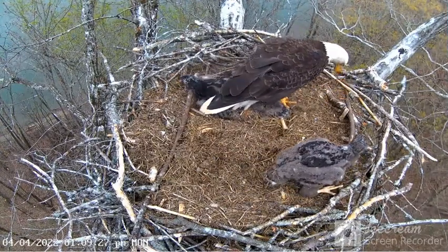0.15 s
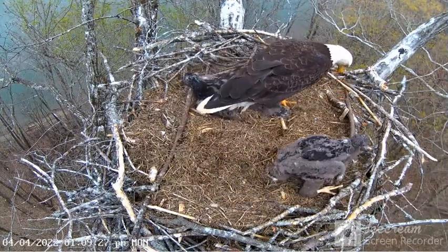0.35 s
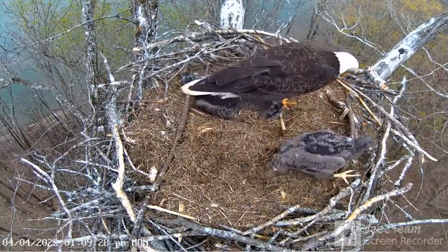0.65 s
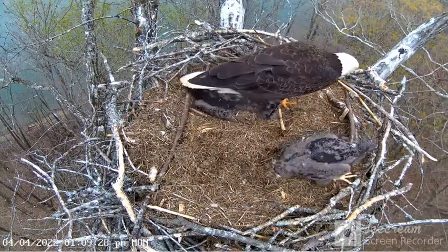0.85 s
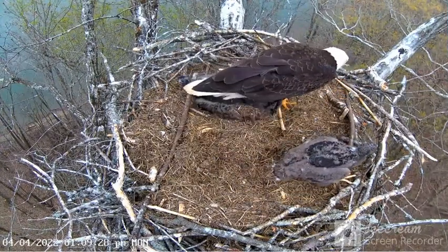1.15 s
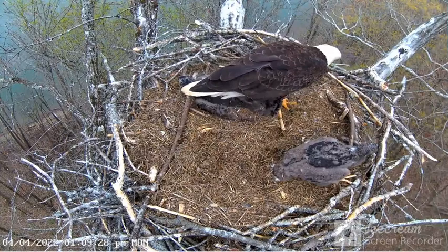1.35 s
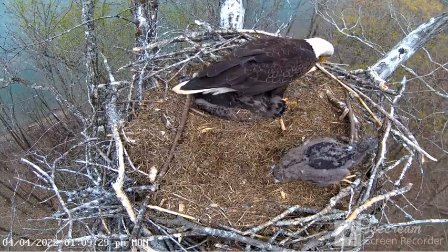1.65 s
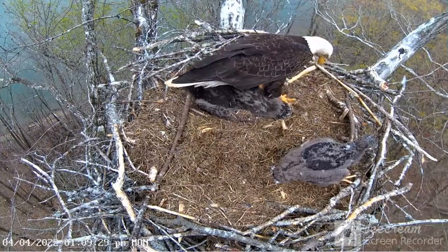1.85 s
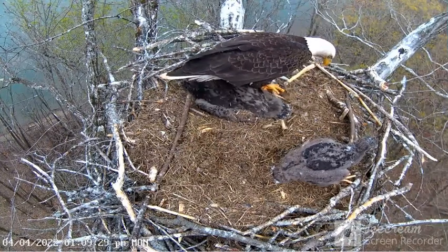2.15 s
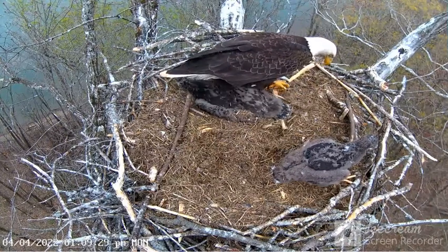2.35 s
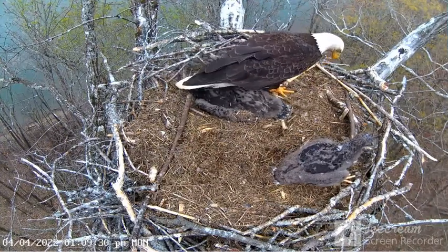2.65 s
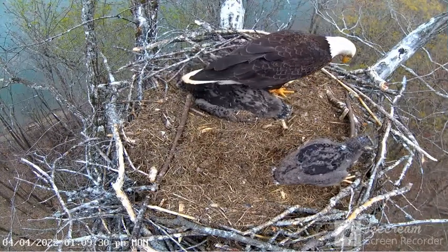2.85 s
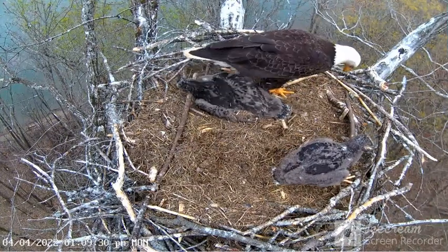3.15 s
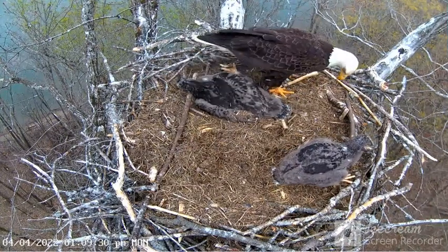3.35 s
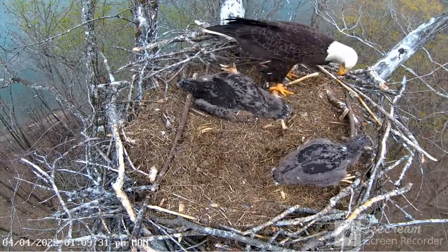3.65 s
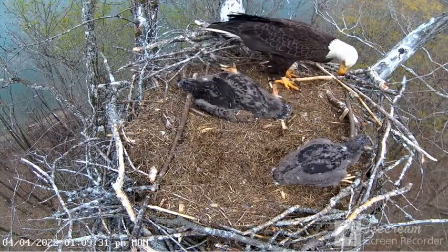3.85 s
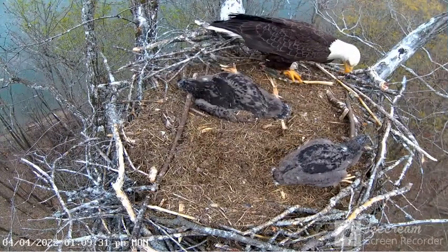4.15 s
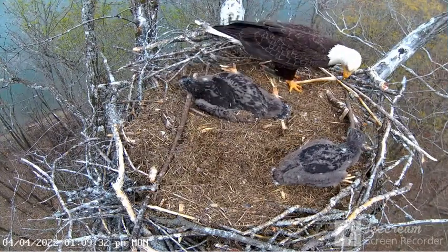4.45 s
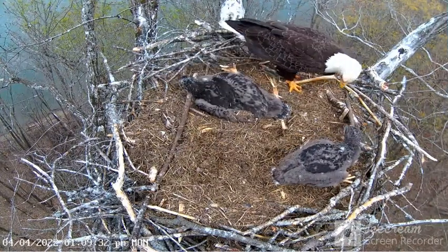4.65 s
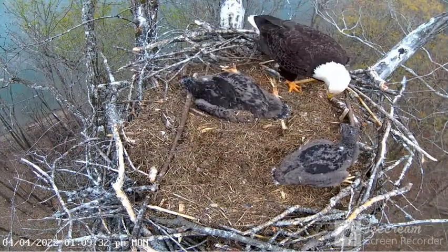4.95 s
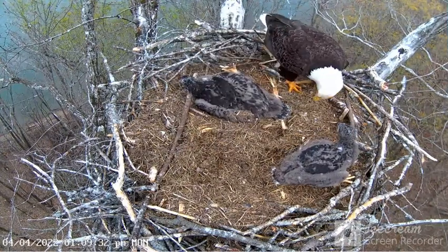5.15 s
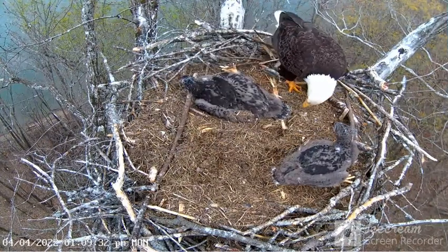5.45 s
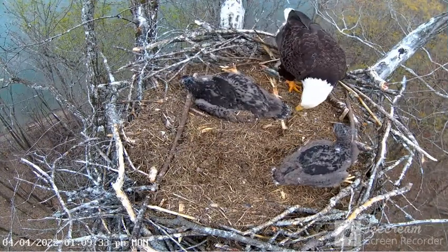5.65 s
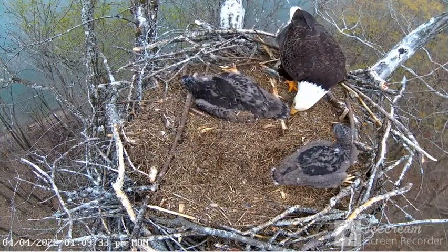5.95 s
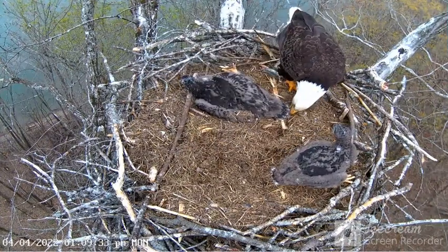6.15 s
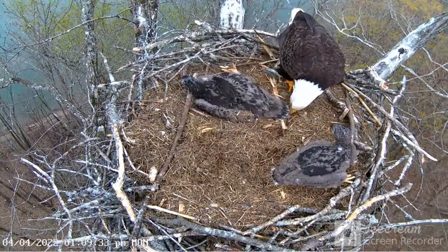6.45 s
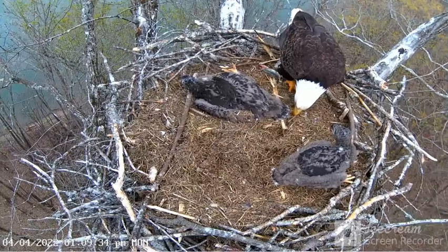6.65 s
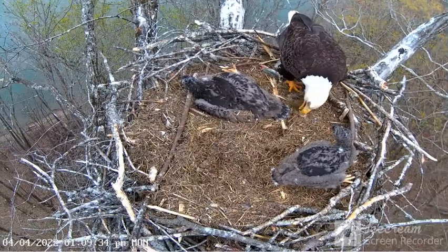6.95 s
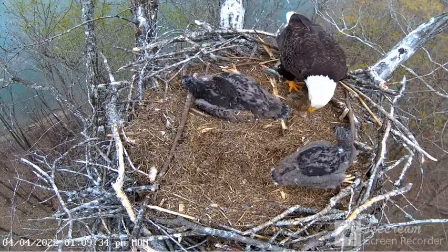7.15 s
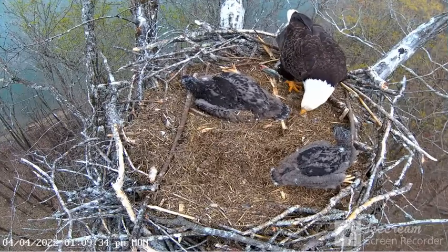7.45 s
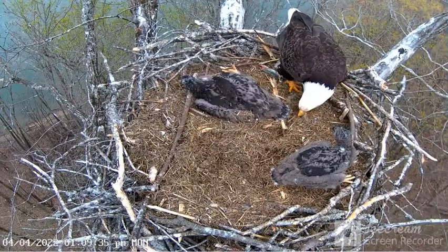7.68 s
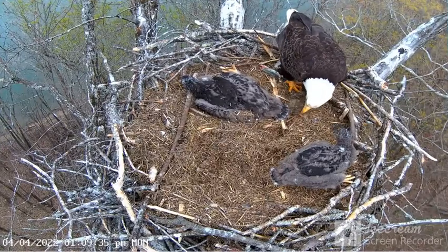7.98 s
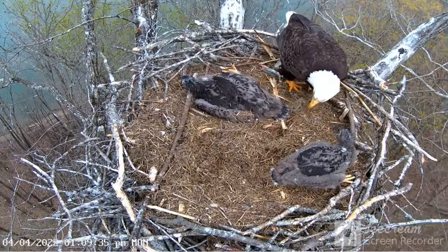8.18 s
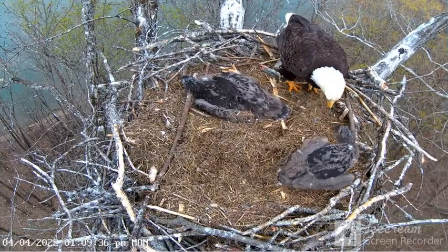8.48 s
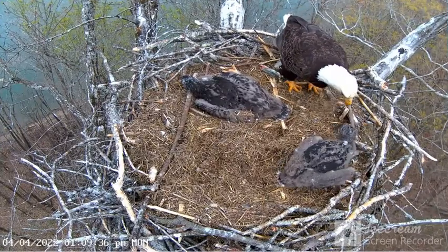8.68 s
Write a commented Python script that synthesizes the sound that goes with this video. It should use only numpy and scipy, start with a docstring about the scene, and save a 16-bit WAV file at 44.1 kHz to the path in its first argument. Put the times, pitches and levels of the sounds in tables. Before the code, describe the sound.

A bald eagle calls shrilly about every second and a half, squeals dropping away, while wind buffets the microphone early and nest twigs tick.

```python
"""Bald eagles at their stick nest, heard by a small microphone fixed beside it.
Seven thin calls, near-sine whistles shaped by a throat resonance: each chirps and breaks into a
strained squeal; six drop away, the last is still high at the end. Noise of rasping air surrounds them.
Twigs tick as band-passed bursts and straw rustles as grainy noise as the adult steps about. Wind,
mostly in the first half, is low noise that swells in gusts, with damped swings for the sharp buffets;
soft hiss lies below."""
import sys
import numpy as np
from scipy import signal
from scipy.fft import rfft, irfft, next_fast_len
from scipy.io import wavfile
from scipy.ndimage import uniform_filter1d

SR = 44100
rng = np.random.default_rng(int(sys.argv[2]) if len(sys.argv) > 2 else 0)


def transcribe(signal):
    """Save signal, clipped to [-1, 1], as a 16-bit WAV file at the path in sys.argv[1]."""
    frames = np.atleast_2d(signal).T
    limited = np.clip(frames, -1, 1)
    pcm = np.round(limited * 32767).astype(np.int16)
    wavfile.write(sys.argv[1], SR, pcm)


N = 388962
TIME = np.arange(N) / SR


def from_db(db):
    """Level in decibels to amplitude ratio."""
    return 10 ** (np.asarray(db) / 20)


def rms_one(x):
    """Signal scaled to unit effective value."""
    return x / np.sqrt(np.mean(x ** 2) + 1e-20)


def in_time(rows):
    """Every column of a curve, joined by straight lines."""
    s, *columns = np.transpose(rows)
    return [np.interp(TIME, s, column) for column in columns]


def gain_at(points, hz):
    """Gain of a spectrum, interpolated in decibels along a log-frequency axis."""
    points = np.array(points)
    log_hz = np.log(np.maximum(hz, 1))
    return from_db(np.interp(log_hz, np.log(points[:, 0]), points[:, 1]))


def coloured(x, spectrum):
    """Linear filtering: the sound's spectrum is multiplied by a smooth gain."""
    size = next_fast_len(N + SR // 10)
    hz = np.arange(size // 2 + 1) * SR / size
    return irfft(rfft(x, size) * gain_at(spectrum, hz), size)[:N]


def noise(spectrum):
    """White noise filtered to a spectral density, with rms 1."""
    return rms_one(coloured(rng.standard_normal(N), spectrum))


def drift(rate_hz):
    """Random modulation: straight lines between random knots, spread 1."""
    knots = rng.standard_normal(N // 10)
    return np.interp(TIME * 2 * rate_hz, np.arange(len(knots)), knots) * np.sqrt(3 / 2)


def gate(start, end, edge=0.0047):
    """Amplitude envelope: 1 between two times, with short ramps."""
    return np.clip(np.minimum(TIME - start, end - TIME) / edge + .5, 0, 1)


def turning(hz):
    """Phase as the running integral of frequency."""
    return 2 * np.pi * np.cumsum(hz) / SR


def evened(x, window_s):
    """Noise divided by its short-time rms, which removes slow swings of level."""
    power = uniform_filter1d(x ** 2, max(int(window_s * SR), 2))
    return x / np.sqrt(power + 1e-6)


def ages(start, length):
    """Time since the start, for each sample of an event."""
    return TIME[int(start * SR):int((start + length) * SR)] - TIME[int(start * SR)]


def eagle(overtone_db=-40, strain_hz=3500):
    """Source and filter: a near-sine whistle, unsteady when strained high, is coloured by the throat."""
    # how strongly each pitch comes through throat and microphone: (frequency [Hz], gain [dB])
    resonance = [(1200, -41), (2000, -20.5), (2550, -9.5), (2950, 6), (3400, -3), (4000, -14.5),
                 (4500, -19.5), (5200, -30.5), (6100, -38), (7000, -32), (7700, -14.5), (8400, -38),
                 (9000, -61)]
    # the voice turns hoarse and the whistle frays: (start [s], end [s], share of noise)
    hoarse_spans = [(0.211, 0.28, 0.79), (0.835, 0.986, 0.4), (1.12, 1.485, 0.2), (2.022, 2.164, 0.28),
                    (3.67, 3.862, 0.32), (3.979, 4.06, .3), (5.111, 5.173, 0.36), (5.657, 5.751, 0.92),
                    (6.331, 6.442, 0.24), (8.112, 8.392, 0.43)]
    # the beak gapes and lets the octave out: (start [s], end [s], gain [dB])
    gapes = [(0.405, 0.5, 34.5), (0.819, 0.997, 35), (3.647, 3.921, 32.5), (5.108, 5.177, 14),
             (6.4, 6.511, 10), (7.587, 7.977, 22.5)]
    # bursts of rasping air: (start [s], length [s], level [dB])
    rasp_bursts = [(0.207, 0.072, -36.5), (0.327, 0.048, -30), (0.504, 0.1, -35.5), (0.746, 0.25, -52.5),
                   (0.756, .018, -40), (0.84, .03, -40), (.915, .025, -43.5), (0.891, 0.0093, -30),
                   (0.943, 0.022, -35), (0.99, 0.5, -56.5), (5.214, 0.43, -56.5), (1.454, 0.077, -40),
                   (1.822, 0.039, -42), (3.652, 0.105, -40), (3.74, 0.16, -54), (3.921, 0.39, -48.5),
                   (3.994, 0.21, -51), (6.832, 0.057, -26), (7.662, 0.42, -68.5), (7.778, 0.039, -41.5),
                   (8.056, 0.31, -39), (8.721, 0.078, -35)]
    rasp_edge_s, release_s = 0.0065, 0.013
    leak_db = -38.5   # air that always leaks past, relative to the drive
    hoarse_lift_hz = 386   # a fully hoarse voice cracks upward
    quaver_share = 0.012   # pitch quaver in the first call
    jitter, waver, shimmer = .0006, .004, .04   # spreads: fast pitch, slow pitch, strength

    hoarse = sum(share * gate(start, end, edge=.04) for start, end, share in hoarse_spans)
    hoarse = np.clip(hoarse, 0, 1)
    lift_hz = hoarse_lift_hz * hoarse ** 4
    wobble = jitter * drift(130) + waver * drift(24)
    tremble = shimmer * drift(83)
    octave = from_db(overtone_db + sum(db * gate(start, end, edge=.015) for start, end, db in gapes))
    quaver = gate(0.43, 0.94, edge=0.033) * drift(32)
    syrinx, breath = np.zeros(N, complex), np.zeros(N)
    for start, attack, pitch, drive_db in [*chirps(), *notes(), *squeals()]:
        age = TIME[:len(pitch)]
        at = int(start * SR) + np.arange(len(pitch))
        opening = np.clip(np.minimum(age / attack, (age[-1] - age) / release_s), 0, 1)
        drive = from_db(drive_db) * np.sin(np.pi / 2 * opening) ** 2
        strain = np.clip(.5 + (pitch - strain_hz) / 1200, .15, 1)
        unsteady = 1 + strain * wobble[at] + quaver_share * quaver[at]
        tone = np.exp(1j * turning((pitch + lift_hz[at]) * unsteady))
        # squaring the complex tone doubles its frequency
        syrinx[at] += drive * (1 + strain * tremble[at]) * (tone + octave[at] * tone ** 2)
        breath[at] += drive
    vibration = np.sqrt(2) * np.real(syrinx * flutter() * fraying(hoarse))
    whistle = coloured(vibration, resonance)
    bursts = sum(from_db(db) * gate(start, start + length, rasp_edge_s)
                 for start, length, db in rasp_bursts)
    return whistle + eased(bursts + from_db(leak_db) * breath) * rasping()


def chirps():
    """Exponential relaxation towards a top pitch, then a droop: (start, attack, pitch, drive dB)."""
    # opening chirps: (start [s], length [s], asymptotic pitch [Hz], rise time [s], first drive [dB])
    chirp_rows = [(0.296, 0.029, 3338, .016, -25), (1.797, 0.078, 3467, 0.017, -29.5),
                  (3.486, 0.088, 3486, 0.02, -36), (4.874, 0.11, 3412, 0.018, -29),
                  (6.255, .042, 3522, 0.014, -28.5), (7.43, 0.055, 3627, 0.019, -33.5),
                  (8.729, 0.061, 3553, .01, -23.5)]
    from_hz, droop_hz, attack_s = 2780, 197, 0.0039
    swell_db = 6.5   # breath builds over the length of a chirp
    for start, length, top_hz, rise_s, drive_db in chirp_rows:
        age = ages(start, length)
        droop = droop_hz * (age / length) ** 4   # just before the voice breaks
        pitch = top_hz + (from_hz - top_hz) * np.exp(-age / rise_s) - droop
        yield start, attack_s, pitch, drive_db + swell_db * age / length


def notes():
    """Frequency glide with a parabolic bow, as the voice breaks into loud notes."""
    # notes that sag in the middle, or arch if the sag is negative: (start [s], length [s], attack [s],
    # first pitch [Hz], last pitch [Hz], sag [Hz], first drive [dB], fade over the note [dB])
    note_rows = [(0.223, 0.041, .012, 2876, 2812, -800, -28, 2),
                 (0.319, .247, 0.0066, 3148, 3264, 284.5, -14, 10),
                 (0.561, 0.051, .004, 3170, 3348, 158, -16, 1),
                 (0.603, 0.142, .005, 3093, 3430, 180.5, -20, 1.5),
                 (0.741, 0.061, 0.0043, 3347, 3354, 42, -36.5, 0.5),
                 (0.79, 0.036, 0.0042, 3410, 3760, 18.5, -25, -4.5),
                 (1.863, .128, 0.015, 3150, 3242, 222, -14.5, 9.5),
                 (3.561, 0.073, .016, 2958, 3173, 105, -22, -2),
                 (3.623, .124, .006, 3337, 3691, -30.5, -21.5, 7.5),
                 (4.966, .123, .004, 2922, 3198, 82.5, -11, 9),
                 (5.085, 0.069, .005, 3312, 3517, -0.5, -15.5, 16.5),
                 (6.29, .017, 0.0036, 3037, 3330, 6.5, -8.5, 0.5),
                 (6.298, .062, 0.0034, 3370, 3197, -160, -12.5, 4.5),
                 (6.353, 0.051, 0.0049, 3262, 3418, -61.5, -16.5, 8.5),
                 (6.395, 0.063, .004, 3390, 3184, 7, -30, 12.5),
                 (7.462, 0.041, 0.0056, 3082, 3470, -7, -7, 17.5),
                 (7.495, 0.098, 0.0098, 3285, 3257, 157.5, -13, 3.5),
                 (8.737, 0.027, .004, 2140, 2368, 3, -0.5, -6.5),
                 (8.758, 0.026, 0.0026, 2750, 3322, -1.5, -10, 1)]
    for start, length, attack, first_hz, last_hz, sag_hz, drive_db, fade_db in note_rows:
        done = ages(start, length) / length
        bow = 1 - (2 * done - 1) ** 2
        pitch = first_hz + (last_hz - first_hz) * done - sag_hz * bow
        yield start, attack, pitch, drive_db - fade_db * done


def squeals():
    """Tension relaxes towards a top pitch; in all but the last it then lets go into a loud yelp."""
    # thin squeals; the last drop lies past the end of the sound: (start [s], drop [s],
    # first pitch [Hz], asymptotic pitch [Hz], climb time [s], first drive [dB], last drive [dB],
    # drive in the drop [dB])
    squeal_rows = [(0.8, 1.492, 3641, 4835, 0.43, -35, -24, -20),
                   (1.985, 2.184, 3227, 3529, 0.029, -21, -29, -13.5),
                   (3.638, 4.337, 3640, 4497, .34, -29.5, -14, -20),
                   (5.101, 5.804, 3777, 4083, 0.13, -22.5, -17.5, -10),
                   (6.337, 6.867, 3542, 3996, .045, -21, -17.5, -10.5),
                   (7.551, 8.407, 3544, 4356, 0.3, -24, -24.5, -16),
                   (8.769, 8.881, 3080, 3580, 0.0075, -12.5, -2, 4)]
    # the squeal wavers, swelling or catching: (time [s], half length [s], bend [Hz], level change [dB])
    wavers = [(0.903, 0.016, -190, 8), (.947, .01, -91, 5.5), (1.104, 0.032, 49.5, 0.5),
              (1.223, 0.033, 110.5, -2), (1.348, .025, 131, 4.5), (1.997, 0.012, -2, -13),
              (3.963, 0.014, -0.5, -14), (4.025, .03, -30, -11.5), (4.311, 0.015, -1, -14),
              (5.114, .015, -0.5, -3), (5.571, .045, 81, 0.5), (5.689, .025, 2, -9.5),
              (5.783, 0.015, -1, -9.5), (6.406, .045, -38.5, -19), (7.614, 0.022, 68.5, 1.5),
              (7.645, .008, -90.5, -2.5), (7.695, 0.016, -57.5, -16), (7.747, 0.034, 80, 5),
              (7.933, .014, -39.5, -14.5), (8.008, 0.05, 0.5, 5.5), (8.208, 0.022, 0.5, -7.5),
              (8.401, .009, -120, 18)]
    attack_s = 0.032   # a squeal grows slowly out of the note before it
    # landing pitch, near the throat resonance; fall time; length of the voice after the drop
    yelp_hz, drop_s, drop_end_s = 3044, 0.015, 0.038
    lag_s, rise_s = 0.0026, 0.0085   # the pitch lands just after the yelp starts to swell
    sag_hz_per_s, fade_db_per_s = 17000, 149   # then it slides on down and fades
    for start, drop, first_hz, top_hz, climb_s, first_db, last_db, drop_db in squeal_rows:
        held = drop - start
        age = ages(start, held + drop_end_s)
        pitch = top_hz + (first_hz - top_hz) * np.exp(-age / climb_s)
        drive_db = first_db + (last_db - first_db) * age / held
        for s, half_length, bend_hz, level_db in wavers:
            bump = np.exp(-((start + age - s) / half_length) ** 2)
            pitch = pitch + bend_hz * bump
            drive_db = drive_db + level_db * bump
        late = age - held - lag_s
        fallen = np.exp(np.minimum(late, 0) / drop_s)
        sliding = np.maximum(late, 0)
        yelp = .5 + .5 * np.tanh((age - held) / rise_s)
        pitch = pitch + (yelp_hz - pitch) * fallen - sag_hz_per_s * sliding
        drive_db = drive_db + (drop_db - drive_db) * yelp - fade_db_per_s * sliding
        yield start, attack_s, pitch, drive_db


def flutter():
    """Modulation side tones: a slow second vibration of the syrinx chops the whistle into pulses."""
    # fluttering stretches: (start [s], end [s], first rate [Hz], last rate [Hz], depth [dB],
    # share of the upper side tones)
    flutters = [(0.315, 0.376, 151.3, 110.9, -10, 0.76), (0.745, 0.797, 190.3, 183.2, -8.5, 0.47),
                (1.028, 1.16, 420, 456.5, -17, .3), (1.16, 1.486, 250, 232, -11.5, 0.89),
                (1.201, 1.47, 700, 699.3, -16, 0.043), (1.462, 1.498, 444, 336.9, -7, .3),
                (1.996, 2.184, 66.9, 128.1, -7, 0.26), (2.009, 2.176, 382.6, 515.7, -16.5, .1),
                (3.631, 3.742, 248.7, 288.2, -6.5, 0.23), (4.02, 4.303, 741.6, 602, -20.5, .25),
                (4.314, 4.342, 326.4, 301.3, -11, .3), (4.87, 4.97, 354, 194.3, -10, 0.24),
                (5.123, 5.191, 645, 702, -14, 0.1), (5.663, 5.752, 624, 652.4, -22, 0.16),
                (6.305, 6.399, 209.9, 402.4, -12, 0.31), (7.572, 7.646, 458, 467, -12, 0.037),
                (8.077, 8.387, 499, 493, -10, 0.23), (8.769, 8.794, 449.7, 598.7, -11.5, 0.18)]
    chop = np.ones(N, complex)
    wander_hz = 14 * drift(90)   # so slow flutters are uneven and fast ones steady
    for start, end, first_hz, last_hz, depth_db, upper in flutters:
        on = gate(start, end)
        at = on > 0
        rate = np.interp(TIME[at], [start, end], [first_hz, last_hz]) + wander_hz[at]
        phase = turning(rate)
        depth = min(from_db(depth_db), .8) * on[at]
        # each pulse starts sharply and sags in pitch, so the lower side tones are the stronger
        lower_tones = 1 / (1 - depth * np.exp(-1j * phase))
        upper_tones = 1 / (1 - min(upper, 1) * depth * np.exp(1j * phase))
        chop[at] *= (lower_tones + upper_tones - 1) / np.sqrt(1 + depth ** 2)
    return chop


def fraying(share):
    """Chaotic vibration, as random modulation, spreads the whistle into a band some hundreds of Hz wide."""
    chaos = (drift(210) + 1j * drift(210)) / np.sqrt(2)
    return np.sqrt(1 - share ** 2 / 2) + share * chaos


def eased(gain):
    """Inertia of breath: its pressure needs a few milliseconds to change."""
    return uniform_filter1d(uniform_filter1d(gain, size=SR // 500), size=SR // 500)


def rasping(grain_db=5, patchy_db=2.5):
    """Turbulence noise: air breaks up in the throat in rapid grains, each band swelling alone; rms 1."""
    # air rasping in the throat: (frequency [Hz], relative density [dB])
    rasp_spectrum = [(1100, -40), (1550, -16.5), (2000, -2), (2500, 4), (2900, 16.5), (3500, 9),
                     (4100, -18), (4700, -34.5), (5300, -49.5)]
    edges = np.geomspace(1200, 6000, 8)
    grains = rng.standard_normal(N) * from_db(2 * grain_db * np.tanh(drift(180) / 2))
    throat_air = evened(coloured(grains, rasp_spectrum), 1 / 50)
    out = 0
    for low, high in zip(edges, edges[1:]):
        sos = signal.butter(2, [low, high], "band", fs=SR, output="sos")
        out = out + signal.sosfilt(sos, throat_air) * from_db(patchy_db * drift(23))
    return rms_one(out)


def squeak():
    """Frequency-swept sine: one short falling blip over the fourth call."""
    # course of the squeak: (time [s], pitch [Hz], level [dB])
    blip = [(5.507, 3570, -60), (5.508, 3240, -26), (5.516, 3070, -19.5), (5.529, 2970, -53)]
    pitch, level_db = in_time(blip)
    return np.sqrt(2) * gate(blip[0][0], blip[-1][0]) * from_db(level_db) * np.sin(turning(pitch))


def snaps(rows, width, t60):
    """Impulsive excitation: short decaying noise, limited to a band of given width in octaves."""
    out, t = np.zeros(N), TIME[:SR // 20]
    for s, peak_db, hz in rows:
        edges = [hz / 2 ** (width / 2), hz * 2 ** (width / 2)]
        band = signal.butter(2, edges, "band", fs=SR, output="sos")
        excitation = rng.standard_normal(len(t)) * from_db(-60 * t / t60)
        burst = signal.sosfilt(np.vstack([band, band]), excitation)
        out[int(s * SR):][:len(t)] += from_db(peak_db) * burst / np.abs(burst).max()
    return out


def rustle(grain_db=3):
    """Friction noise: dry straw crackles in fine grains as the adult shifts its feet."""
    # rustles of the nest: (start [s], length [s], level [dB])
    rustle_rows = [(2.551, 0.035, -57.5), (3.058, 0.082, -64.5), (4.359, 0.22, -56), (4.57, 0.18, -63)]
    # dry straw: (frequency [Hz], relative density [dB])
    straw = [(1000, -30), (1700, -9), (2400, -9), (3050, 6.5), (3700, -7.5), (4500, -22.5), (5300, -23),
             (6500, -39)]
    pressure = sum(from_db(db) * gate(start, start + length, edge=.03) for start, length, db in rustle_rows)
    return pressure * rms_one(noise(straw) * from_db(grain_db * drift(160)))


def woods(x, near_db=-25, near_t60=0.076, far_db=-34, far_t60=.28):
    """Diffuse scattering: near branches return a short tail, the trees beyond a longer, weaker one."""
    t, response = TIME[:SR // 2], 0
    for level_db, t60 in (near_db, near_t60), (far_db, far_t60):
        tail = rng.standard_normal(len(t)) * from_db(-60 * t / t60) * (t > .008)
        response = response + from_db(level_db) * tail / np.linalg.norm(tail)
    return x + signal.fftconvolve(x, response)[:N]


def wind(lumpy_db=4):
    """Flow noise: eddies on the microphone port give a deep rumble and lumpy turbulence in the gusts."""
    # gusts rising over the breeze, before limiting:
    # (start [s], hold [s], rumble level [dB], turbulence level [dB])
    gust_rows = [(0.038, 0.0075, -19.5, -53), (0.29, 0.073, -22, -35), (0.545, 0.051, -14.5, -34.5),
                 (0.828, 0.24, -19, -44.5), (0.956, 0.065, -11, -17.5), (1.209, 0.0061, -15.5, -25.5),
                 (1.428, .06, -17.5, -45), (1.469, 0.069, -11.5, -17), (1.569, 0.044, -21, -36),
                 (1.676, 0.01, -13.5, -22.5), (1.709, 0.066, -26, -29), (2.038, 0.069, -24, -50.5),
                 (2.155, 0.031, -20.5, -29), (2.289, 0.0077, -17, -31.5), (2.533, 0.22, -21.5, -18.5),
                 (2.662, 0.16, -24, -25), (3.035, 0.096, -17.5, -16.5), (3.146, 0.11, -12.5, -20.5),
                 (3.301, 0.059, -14, -20), (3.537, 0.0079, -22.5, -17.5), (3.547, 0.038, -24, -31),
                 (3.741, 0.06, -19.5, -43), (3.867, 0.1, -20.5, -46), (4.012, 0.047, -11, -21.5),
                 (4.303, 0.05, -32, -44.5), (4.393, 0.031, -15, -22.5), (4.461, 0.12, -30, -41.5),
                 (5.532, 0.009, -31.5, -62), (6.266, 0.008, -20, -64.5), (6.469, 0.032, -25, -65),
                 (6.579, 0.038, -22, -60.5), (6.757, 0.045, -33.5, -45), (8.026, 0.11, -34.5, -76)]
    # steady breeze, before limiting: (time [s], rumble level [dB])
    breeze = [(0, -27), (.5, -31), (1.3, -32.5), (1.95, -40.5), (2.35, -33.5), (2.95, -36), (4.25, -35),
              (4.7, -45.5), (5.15, -41), (5.8, -57.5), (6.6, -39.5), (7.1, -61.5), (8.8, -65)]
    # deep rumble: (frequency [Hz], relative density [dB])
    rumble_spectrum = [(20, 3), (70, 7.5), (150, -3), (230, -17.5), (340, -50), (600, -79)]
    # turbulence: (frequency [Hz], relative density [dB])
    turbulence_spectrum = [(30, -21.5), (130, 2), (220, 5), (300, -1.5), (450, -11.5), (620, -23.5),
                           (850, -41), (1300, -58), (2000, -64.5)]
    rise_s, fall_s = 0.0086, 0.011   # time constants of every gust
    breeze_db, = in_time(breeze)
    low = from_db(breeze_db)
    high = from_db(breeze_db - 22)   # breeze turbulence [dB] relative to its rumble
    for start, hold, rumble_db, turbulence_db in gust_rows:
        away = np.maximum((start - TIME) / rise_s, (TIME - start - hold) / fall_s)
        swell = np.exp(-np.clip(away, 0, 20))
        low = np.maximum(low, from_db(rumble_db) * swell)
        high = np.maximum(high, from_db(turbulence_db) * swell)
    rumble = low * from_db(lumpy_db * drift(9.9) / 2) * evened(noise(rumble_spectrum), 0.021)
    turbulence = high * from_db(lumpy_db * drift(65)) * evened(noise(turbulence_spectrum), 0.015)
    # the narrow port limits the flow and passes only the low swings
    limited = .55 * np.tanh((rumble + turbulence) / .55)
    return signal.sosfilt(signal.butter(4, 700, fs=SR, output="sos"), limited)


def buffets(level_db=-3, cycles=1.0):
    """Damped oscillation: a strong eddy shoves the diaphragm, which swings back in a cycle or two."""
    # sharp buffets: (time [s], level relative to level_db [dB], pitch [Hz])
    buffet_rows = [(0.964, 3, 161), (1.484, 8, 154), (1.526, 3, 173), (1.538, 0.5, 249), (1.674, 1.5, 288),
                   (1.758, -17, 263), (2.548, 11, 144.7), (2.573, 5, 270), (2.593, -0.5, 280),
                   (2.666, 1, 245), (2.676, -10.5, 318), (2.727, 2, 245), (2.825, -13.5, 222),
                   (3.044, 2, 241.5), (3.073, 5, 251), (3.125, 5, 182), (3.098, -1, 215),
                   (3.162, -1.5, 198), (3.186, -0.5, 283), (3.348, -10, 280), (3.541, -9.5, 364),
                   (3.756, 0, 131), (4.036, -14, 313), (4.052, -0.5, 156), (4.406, -8, 193)]
    out, t = np.zeros(N), TIME[:SR // 10]
    for s, relative_db, hz in buffet_rows:
        age = t * hz / cycles
        envelope = (2 * age * np.exp(1 - 2 * age)) ** 3
        swing = envelope * np.sin(2 * np.pi * hz * t + rng.uniform(0, 2 * np.pi))
        out[int(s * SR):][:len(t)] += from_db(relative_db + level_db) * swing
    return out


def port(pressure):
    """Saturation: the diaphragm runs out of travel in strong gusts; its cover muffles the crunch."""
    held = pressure / (1 + (pressure / .92) ** 6) ** (1 / 6)
    return signal.sosfilt(signal.butter(3, 2000, fs=SR, output="sos"), held)


def air(gusts, sink_db=-8):
    """Level-dependent gain: a restless hiss sinks under strong gusts and comes back slowly."""
    # still air: (frequency [Hz], relative density [dB])
    air_spectrum = [(20, -13), (60, -2.5), (120, -9.5), (250, -15.5), (700, -28), (1000, -40.5),
                    (1400, -39), (2000, -30.5), (2900, -24), (3650, -26), (4400, -56), (8000, -67.5)]
    gust_db = 10 * np.log10(uniform_filter1d(gusts ** 2, size=SR // 30).clip(1e-9))
    held_db = np.maximum.accumulate(gust_db + 30 * TIME) - 30 * TIME   # falls at most 30 dB per s
    sunk = np.clip((held_db + 32) / 14, 0, 1)
    still_air = from_db(-55 + sink_db * sunk + drift(5.3)) * noise(air_spectrum)
    electronics = from_db(-80.5) * rng.standard_normal(N)   # steady hiss
    return still_air + electronics


def scene():
    """Superposition: all sources meet at one microphone, whose treble leans to the right."""
    # twigs ticking under the feet: (time [s], peak before the low-pass [dB], pitch [Hz])
    ticks = [(.381, -30, 2135), (.771, -31, 2130), (.967, -26.5, 2250), (2.552, -38, 2260),
             (2.575, -33, 2270), (3.045, -42, 2000), (3.073, -30, 2400), (3.127, -36, 2220),
             (4.478, -31.5, 3070), (4.544, -28, 3100), (5.431, -23.5, 2900), (6.028, -28.5, 2470),
             (6.257, -22, 2320), (6.433, -27.5, 2480), (6.587, -31, 2900), (6.837, -28.5, 2520),
             (7.139, -42, 2540), (7.803, -32.5, 2470)]
    # bright cracks in the first call: (time [s], peak [dB], pitch [Hz])
    crack_rows = [(.342, -29.5, 6150), (.349, -34, 6790), (.563, -21, 6160), (.576, -27.5, 6200)]
    treble_lean = 0.11   # share of the treble moved from left to right
    twigs = snaps(ticks, width=.85, t60=0.0082)
    twigs = signal.sosfilt(signal.butter(8, 4300, fs=SR, output="sos"), twigs)
    cracks = snaps(crack_rows, width=.2, t60=0.016)
    stick = snaps([(5.175, -29.5, 950)], width=2.4, t60=0.0063)   # a thicker stick knocks lower
    nest = twigs + cracks + stick + rustle()
    gusts = port(wind() + buffets())
    mono = woods(eagle() + squeak() + nest) + gusts + air(gusts)
    treble = signal.sosfilt(signal.butter(1, 1500, "high", fs=SR, output="sos"), mono)
    return mono + treble_lean * treble * np.array([[-1], [1]])


def record(dry):
    """Aliasing: slow sampling mirrors overtones about 8 kHz; peaks are rounded and the top is cut."""
    top = signal.sosfilt(signal.butter(8, 7200, "high", fs=SR, output="sos"), dry)
    shifted = 2 * top * np.cos(2 * np.pi * 16000 * TIME)
    mirrored = signal.sosfilt(signal.cheby1(10, 1, 8300, fs=SR, output="sos"), shifted)
    both = dry + from_db(-5) * mirrored
    rounded = both / (1 + both ** 20) ** (1 / 20)
    return signal.sosfilt(signal.cheby2(12, 70, 15700, fs=SR, output="sos"), rounded)


dry = scene()
out = record(dry)
transcribe(out)
```